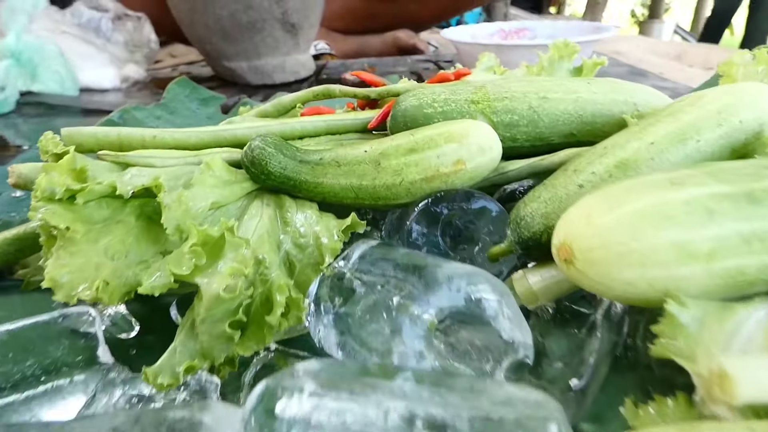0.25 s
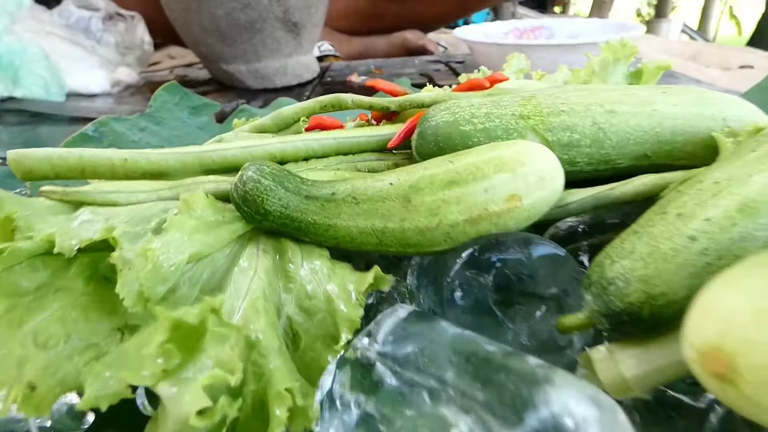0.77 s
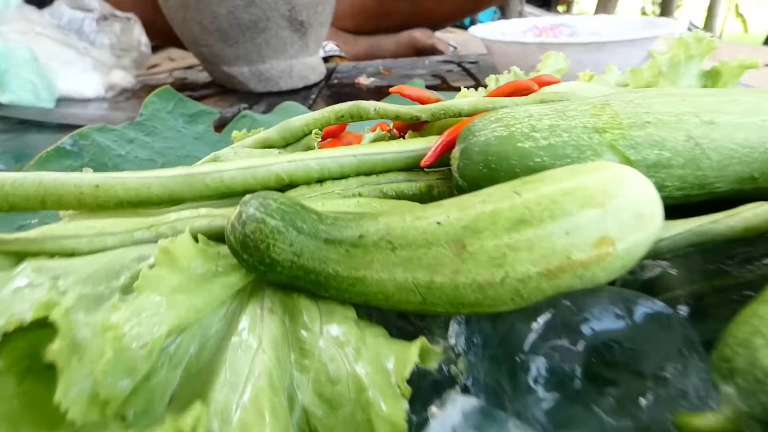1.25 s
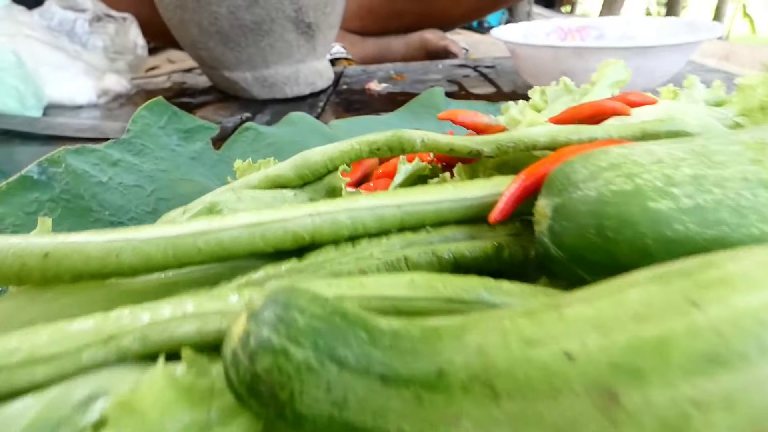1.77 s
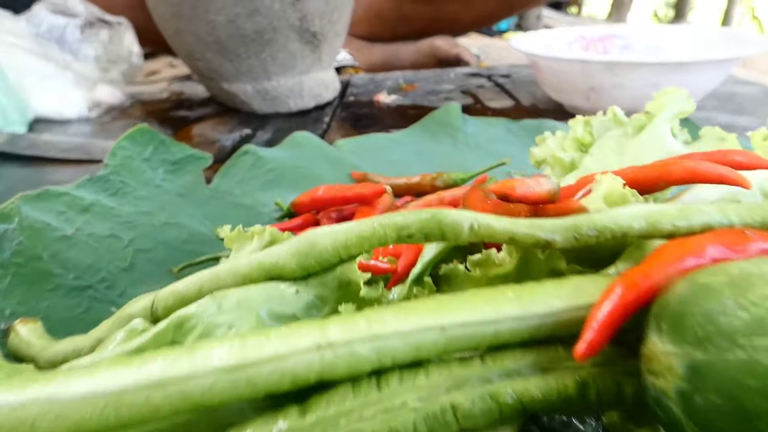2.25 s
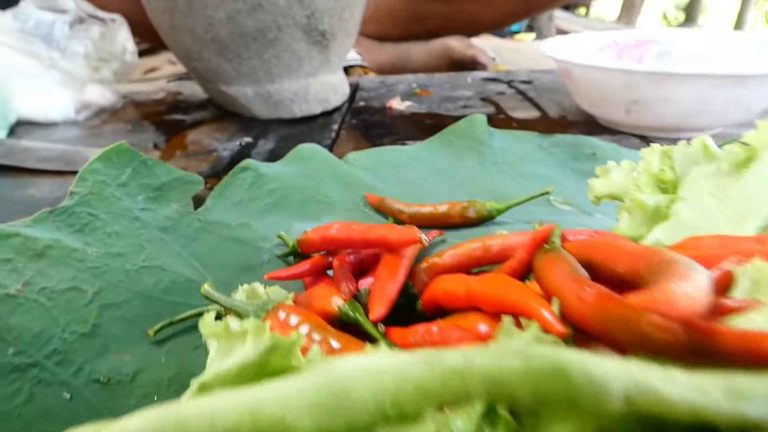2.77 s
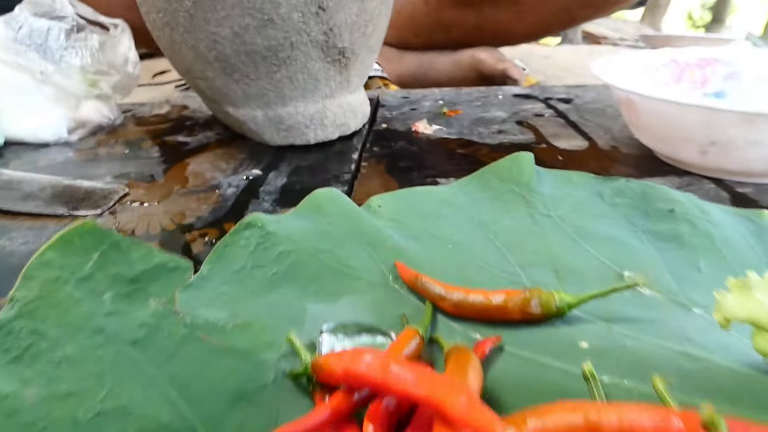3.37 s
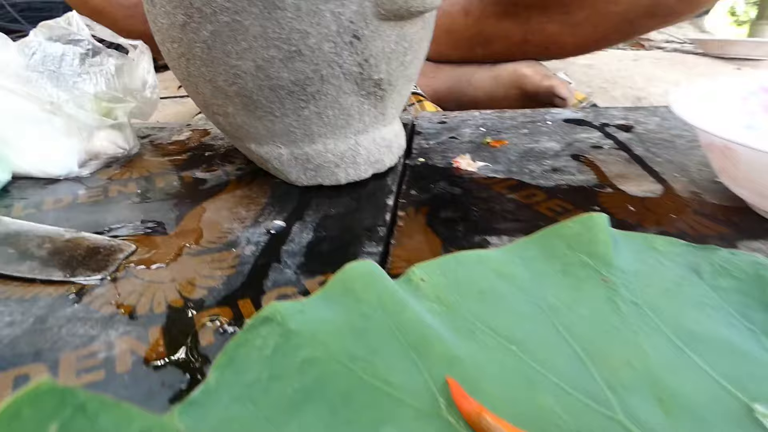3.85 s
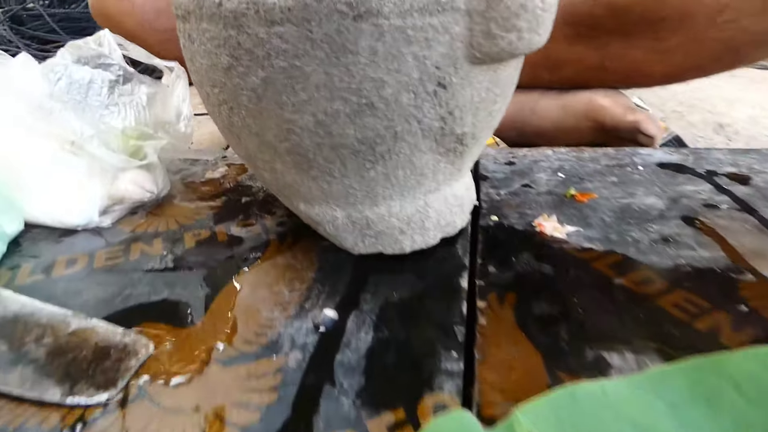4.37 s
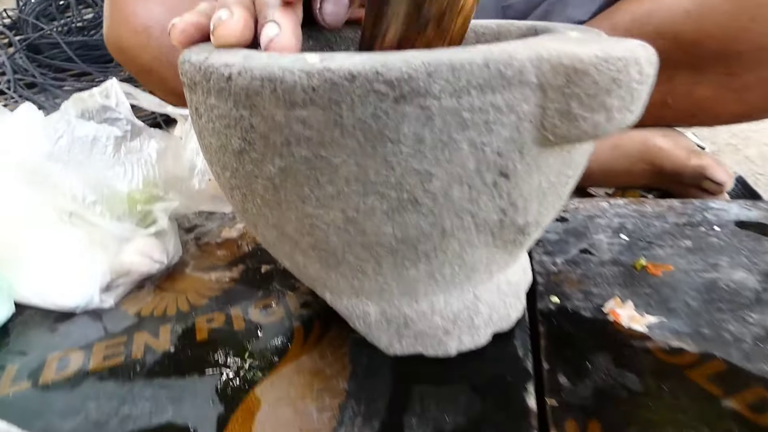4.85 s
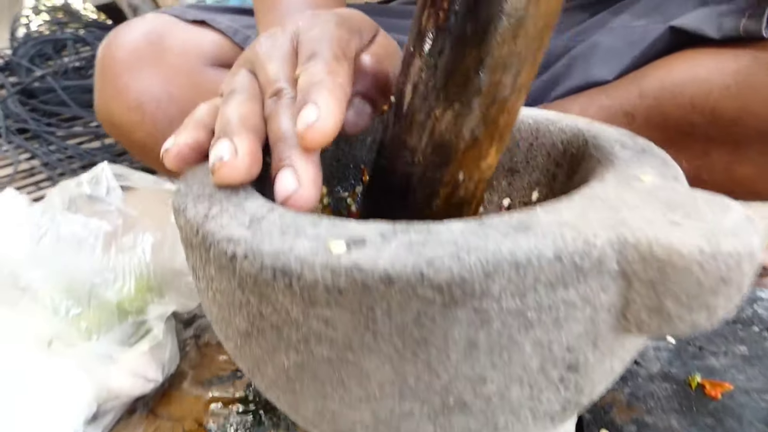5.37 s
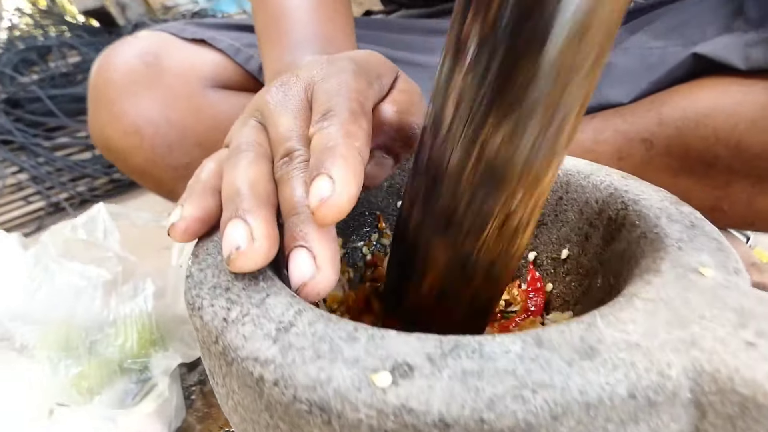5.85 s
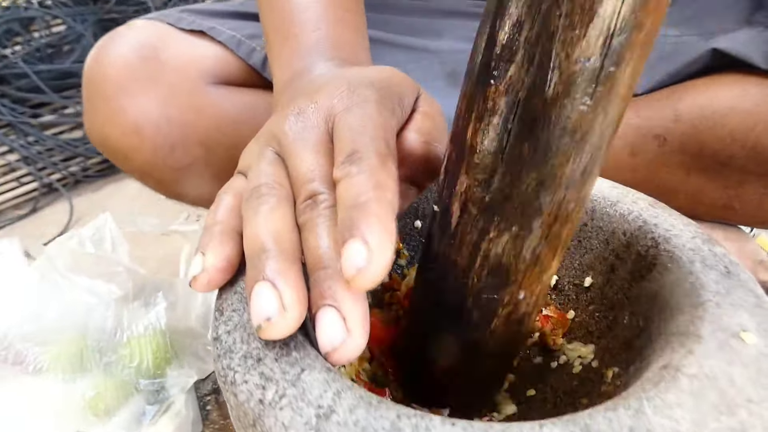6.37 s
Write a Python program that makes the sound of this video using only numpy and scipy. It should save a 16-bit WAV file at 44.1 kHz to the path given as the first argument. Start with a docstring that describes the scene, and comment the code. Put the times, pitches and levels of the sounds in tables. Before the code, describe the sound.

Outdoors in an open shelter, heard very close and nearly dry, a wooden pestle scrapes wet paste and strikes a stone mortar almost at once. Blows continue steadily about every 0.35 seconds until 6.4. Each is a short, dull thud with a woody board knock, a brief stony ring and a juicy crunch; force and hardness vary, some stonier, others muffled by paste. About halfway between blows the heavy mortar rocks back with a softer thud or clack. Scrapes are clearest before 1.2; squirts and sticky smacks follow throughout. Sharp seed snaps dot the sound, one strong near 3.0, a cluster from 4.1 to 4.9 and another at 6.4. Low outdoor air and a thin high insect hiss lie behind. Between 1.3 and 2.2, four faint, hoarse, sagging rooster-like syllables sound far away.

```python
"""First you hear a wooden pestle scrape wet paste and pound it in a stone mortar on a board, outdoors and close by.
Each blow squashes chillies and garlic (shaped noise and tiny bubbles), and rings stone and board (fading sines).
The mortar then rocks on the board with softer thuds and clacks; paste smacks and seeds snap between blows.
Far off there is a thin insect hiss (a narrow band of noise) and a call like a rooster's (sagging tones)."""
import sys
import numpy as np
from scipy import signal
from scipy.fft import rfft, irfft
from scipy.io import wavfile
from scipy.ndimage import uniform_filter1d

SR = 44100
rng = np.random.default_rng(int(sys.argv[2]) if len(sys.argv) > 2 else 0)


def waveform_to_disk(signal):
    """Save audio, clipped to [-1, 1], as 16-bit WAV at the path in sys.argv[1]."""
    frames = np.transpose(np.atleast_2d(signal))
    scaled = np.clip(frames, -1, 1) * 32767
    samples = np.round(scaled).astype(np.int16)
    wavfile.write(sys.argv[1], SR, samples)


N = 291489
TIME = np.arange(N) / SR
AGE = np.arange(SR // 4) / SR  # seconds since a hit

# outdoor air, its tone: (frequency [Hz], level per Hz [dB])
AIR = [(25, -13), (70, -8.5), (150, 5.5), (300, -1), (500, -7), (700, -8), (950, -12), (1500, -11.5),
       (3000, -19), (6200, -24), (15000, -38.5)]
# outdoor air, its loudness before it wavers: (time [s], level [dB])
AIR_LEVEL = [(0, -46), (3.2, -43.5), (4.8, -50), (5.2, -50), (6.6, -54)]
# syllables of a distant crow: (middle [s], length [s], pitch [Hz], level [dB], octave over fundamental [dB])
CROW = [(1.313, 0.1, 845, -44, -14), (1.498, 0.19, 712, -46, -10), (1.712, .14, 808, -42, -12),
        (2.135, 0.22, 624, -46.5, 1)]
# where the mortar stands: (time [s], left minus right [dB])
PLACE = [(0, -0.5), (3.3, 0.5), (5.3, -3), (6.6, -1.5)]
# the microphone closes in on the board and catches more of its bass: (time [s], low edge [Hz])
BASS_EDGE = [(0, 185), (1.2, 173), (3, 146), (6.6, 140)]
# how busily loose bits crackle in the bowl, before it flickers: (time [s], level [dB])
CRUMBS = [(0, -57), (2.1, -61), (3.1, -56), (4.8, -58), (5.25, -66), (6.6, -71)]
# seeds and flakes of skin snap in the bowl: (time [s], peak level [dB], ring pitch [Hz])
SNAPS = [(0.0084, -20, 3780), (0.354, -20.5, 2730), (1.0328, -25.5, 3900), (1.3215, -18.5, 3800),
         (1.7884, -24.5, 3540), (2.1979, -25, 4450), (2.437, -21.5, 1740), (3.0354, -11.5, 3210),
         (3.7445, -26, 1740), (4.081, -16, 4100), (4.1881, -15, 3580), (4.2109, -15, 4100),
         (4.261, -25, 1810), (4.42, -15, 3220), (4.521, -13, 3520), (4.5986, -18, 4000), (4.767, -16, 3200),
         (4.8772, -17, 3540), (6.418, -11, 6900)]
# colour of the wet paste: (frequency [Hz], level [dB])
PASTE = [(50, -56), (150, -9.5), (450, 2), (1600, -7.5), (2300, -8), (3600, -5.5), (7500, -12),
         (10500, -12.5), (12500, -19.5), (15000, -27)]
# resonances of the air in the bowl, which colour the paste: (frequency [Hz], width [Hz], level [dB])
HOLLOW = [(1760, 130, -6), (2812, 90, -7), (3808, 90, -3), (4530, 90, -7)]
# the pestle meets paste on the wall and scrapes down it until it lands: (first touch [s], level on landing [dB])
SCRAPES = [(0.008, -27), (0.357, -30), (0.729, -36), (0.762, -21.5), (1.107, -28), (3.242, -41.5),
           (3.972, -43)]
# sticky paste lets go of the pestle or drops back: (time [s], level [dB], fall [s])
SMACKS = [(0.117, -34, 0.01), (0.223, -47.5, 0.15), (0.39, -27.5, 0.016), (0.51, -37.5, 0.019),
          (0.596, -40, 0.02), (0.8, -33, 0.073), (0.875, -29, 0.018), (1.187, -33.5, 0.016),
          (1.228, -31.5, 0.021), (1.726, -29.5, 0.011), (3.471, -38.5, 0.013), (3.701, -38, 0.018),
          (4.085, -31.5, 0.016), (4.19, -30.5, 0.026), (4.512, -30, 0.016), (4.733, -30, 0.018),
          (4.937, -48.5, 0.043), (5.209, -41.5, 0.0092), (5.568, -38.5, 0.012), (6.019, -33, 0.0098),
          (6.107, -39.5, 0.03), (6.487, -39.5, 0.028)]
# less paste under the blow: louder stone, shorter and duller splat: (stone ring [dB], fall [s], brightness [dB])
CUSHION = [(-38, .006, 4), (-23, .0045, 7), (-14, .0012, -3)]
# the mortar rocks and lands on the board again: (time [s], thud [dB], thud pitch [Hz], clack [dB])
LANDINGS = [(0.098, -33, 325, -30.5), (0.223, -34.5, 299, -30.5), (0.453, -39, 206, -22.5),
            (0.462, -18.5, 304, -24.5), (0.479, -33, 307, -23), (0.796, -37, 296, -18),
            (0.811, -20.5, 305, -29), (0.827, -29, 317, -36), (0.843, -31, 299, -23),
            (1.189, -43, 293, -16.5), (1.213, -42, 288, -29), (1.532, -19, 276.5, -41),
            (1.551, -41, 258, -25.5), (1.907, -25, 277, -28), (2.272, -34, 274, -28),
            (2.972, -22.5, 277, -21), (3.318, -23, 274, -25.5), (3.609, -33, 273, -56),
            (3.669, -23, 287, -49), (3.711, -28, 281, -30.5), (4.05, -29.5, 281, -56),
            (4.358, -25, 250, -32), (4.694, -23.5, 266, -41), (5.023, -33.5, 244, -35.5),
            (5.35, -24, 236, -60), (5.394, -25, 235, -31), (5.745, -23, 260, -28), (6.104, -31, 282, -31),
            (6.401, -36, 234, -56), (6.437, -25, 252.6, -29.5)]
# bending modes of the board, varied a little at each hit: (pitch [Hz], level [dB], time to fall 60 dB [s])
BOARD = [(291.6, -2.5, 0.22), (361, -4.5, 0.13), (432, 1, 0.076), (544.4, 2, 0.053), (616, -1.5, 0.055),
         (681, -2.5, 0.028), (770, 6.5, 0.02), (910, 9.5, 0.012), (874, -5.5, 0.021)]
# modes of the stone bowl: (multiple of the ring pitch [ratio], level [dB], time to fall 60 dB [s])
STONE = [(0.862, -12.5, 0.012), (0.998, -8, 0.018), (1.03, -27.5, 0.082), (2.62, -12.5, 0.0013)]
# pestle blows: (time [s], thud [dB], thud pitch [Hz], thud's time to fall 60 dB [s], wooden knock [dB],
# knock's top [Hz], stone ring [dB], ring pitch [Hz], splat [dB], squirt's delay [s], squirt [dB])
BLOWS = [(0.0374, -38, 222, 0.063, -13.5, 1300, -15.5, 1280, -14, .004, -50),
         (0.4182, -18.5, 190, 0.059, -23.5, 620, -46, 1690, -22, 0.0011, -25.5),
         (0.782, -22, 249, 0.033, -22.5, 1000, -36, 1500, -23.5, 0.0051, -26),
         (1.1431, -21.5, 264, 0.15, -14, 920, -20.5, 1570, -20, 0.0063, -31),
         (1.514, -20.5, 195, 0.057, -20, 700, -33.5, 1370, -19, 0.015, -25),
         (1.88, -24, 198, 0.04, -14, 955, -18.5, 1340, -26.5, 0.025, -36),
         (2.2496, -24, 221, 0.038, -16, 1040, -14, 1333, -19.5, 0.021, -39.5),
         (2.608, -51, 249, 0.1, -18.5, 1200, -15.5, 1293, -24.5, 0.045, -33.5),
         (2.952, -15.5, 200, 0.081, -23, 710, -31.5, 1550, -23, 0.026, -28),
         (3.2988, -16.5, 193, 0.029, -15, 1030, -23, 1580, -18, 0.008, -27.5),
         (3.6541, -11.5, 240, 0.026, -21.5, 460, -48, 1420, -30, 0.013, -30.5),
         (4.007, -14.5, 183, 0.031, -15, 550, -24, 1690, -23.5, 0.021, -34.5),
         (4.341, -14.5, 188, 0.015, -17.5, 710, -20, 1603, -20.5, 0.018, -34.5),
         (4.672, -19.5, 153, 0.045, -25, 550, -25, 1710, -20.5, 0.011, -27.5),
         (5.011, -37, 230, 0.15, -34, 1300, -13, 1320, -14, 0.035, -43.5),
         (5.336, -38, 232, 0.089, -25, 1300, -33, 1170, -56, 0.033, -24.5),
         (5.7173, -17.5, 224, 0.034, -15.5, 1000, -21, 1350, -30.5, 0.018, -25),
         (6.0543, -19.5, 198.5, 0.12, -17, 1200, -17, 1350, -26.5, 0.011, -29),
         (6.383, -25.5, 221, 0.093, -26, 860, -37, 1370, -32, 0.027, -28.5)]

# brightness is treble over bass
SCRAPE_RISE_S, SCRAPE_GROWTH_DB_PER_S, SCRAPE_BRIGHT_DB = .003, 75, -8.5
SPLAT_RISE, SPLAT_LEAD = .4, .3  # the rise, and how far it peaks ahead of the landing, as shares of its fall
SQUIRT_RISE_S, SQUIRT_FALL_S, SQUIRT_BRIGHT_DB = .0075, .009, 7.5
OOZE_DB, OOZE_FALL_S, OOZE_BRIGHT_DB = -8, 0.029, -2.5  # the squirt's tail, level relative to the squirt
SMACK_RISE_S, SMACK_BRIGHT_DB = .0014, -8.5
SPATTER_DB, SPATTER_RISE_S, SPATTER_FALL_S = -19, .0012, .009  # juice from a snap, relative to its peak
PRESS_S = 0.024  # the pestle bears down and damps the board's knock
STONE_EDGE_HZ = 265  # the small bowl sends out little below this
TOP_HZ = 15600


def undb(db):
    """Decibels to gain."""
    return 10 ** (np.asarray(db) / 20)


def at(s, rows):
    """Read a table of (time, value) at time s, joined by straight lines."""
    return np.interp(s, *np.transpose(rows))


def unit(x):
    """Scale to an rms (average strength) of 1."""
    return x / np.sqrt(np.mean(x ** 2))


def struck(x, db):
    """Set the level of the first fiftieth of a second of a hit."""
    return x * undb(db) / np.sqrt(np.mean(x[:SR // 50] ** 2))


def crest(x, db):
    """Set the level of the loudest fiftieth of a second of a sound."""
    return x * undb(db) / np.sqrt(uniform_filter1d(x ** 2, SR // 50).max())


def add(out, s, x, pan_db=0):
    """Mix a sound into both channels at time s; pan_db is left minus right."""
    start = int(round(s * SR))
    lo, hi = max(start, 0), min(start + len(x), N)
    gains = undb([[pan_db / 2], [-pan_db / 2]])
    out[:, lo:hi] += gains * x[lo - start:hi - start]


def colour(x, points):
    """Filter by a spectrum of (Hz, dB) points, keeping the power of white noise."""
    hz, db = np.transpose(points)
    f = np.maximum(np.fft.rfftfreq(x.shape[-1], 1 / SR), 1)
    gain = unit(undb(np.interp(np.log(f), np.log(hz), db)))
    return irfft(rfft(x) * gain, x.shape[-1])


def walk(rate):
    """Smooth chance with a spread near 1, taking about rate new values a second."""
    k = int(SR / rate)
    steps = np.repeat(rng.standard_normal(N // k + 1), k)
    return np.sqrt(3 / 2) * uniform_filter1d(steps, k)[:N]


def swell(s, rise, fall):
    """An envelope that peaks at time s."""
    distance = np.maximum((s - TIME) / rise, (TIME - s) / fall)
    return np.exp(-np.minimum(distance, 30))


def mode(hz, t60):
    """One fading resonance, pushed downwards first; it falls 60 dB in t60 seconds."""
    return -np.sin(2 * np.pi * hz * AGE) * np.exp(-np.log(1000) * AGE / t60)


def radiate(x, edge_hz):
    """Air slips round the edges of a small surface, so it sends out no deep bass."""
    return signal.sosfilt(signal.butter(4, edge_hz, "high", fs=SR, output="sos"), x)


def outdoors(insect_hz=7480.0, insect_db=-64.5, width=0.6):
    """Low outdoor air and a narrow insect hiss, both noise that wavers in level."""
    mid, side, left, right = rng.standard_normal((4, N))
    air = colour(np.array([mid + width * side, mid - width * side]), AIR) * undb(walk(3.59))
    band = signal.butter(2, [insect_hz - 190, insect_hz + 190], "band", fs=SR, output="sos")
    insects = unit(signal.sosfilt(band, [left, right])) * undb(insect_db + walk(46))
    return air * undb(at(TIME, AIR_LEVEL)) + insects


def rooster():
    """Four faint, slightly hoarse syllables: harmonics on an unsteady pitch that sags."""
    out = np.zeros(N)
    hoarse, sag = 1 + .009 * walk(140), .04
    for s, length, hz, db, octave_db in CROW:
        along = np.clip((TIME - s) / length, -.5, .5)
        phase = 2 * np.pi * np.cumsum(hz * (1 - sag * along) * hoarse) / SR
        arch = np.sqrt(1 - (2 * along) ** 2)
        overtones = np.sin(2 * phase) + np.sin(3 * phase) / 3
        out += undb(db) * arch * (np.sin(phase) + undb(octave_db) * overtones)
    return out


def shelter(x, t60=0.085, wet_db=-12.0, first_s=0.0004):
    """Small nearby surfaces return a short scatter without bass, different at each ear."""
    fade = np.exp(-np.log(1000) * AGE / t60) * (AGE > first_s)
    tail = radiate(rng.standard_normal((2, len(AGE))) * fade, edge_hz=185.0)
    tail /= np.sqrt(np.sum(tail ** 2, axis=1, keepdims=True))
    return x + undb(wet_db) * signal.fftconvolve(x, tail, axes=1)[:, :N]


def snap(hz, db, crack_s=.0006, ring_t60=.01, ring_db=-2.5, edge_hz=1000.0):
    """Something brittle breaks: a sharp crack, and a short ring at hz and at two chance pitches near it."""
    burst = rng.standard_normal(len(AGE)) * np.exp(-AGE / crack_s)
    crack = radiate(colour(burst, PASTE), edge_hz)[:SR // 40]
    others = sum(mode(hz * 2 ** octaves, ring_t60) for octaves in rng.uniform(-0.81, 1, 2))
    ring = mode(hz, ring_t60) + others / 2
    tick = unit(crack) + undb(ring_db) * unit(ring[:SR // 40])
    return tick * undb(db) / np.abs(tick).max()


def seeds(count=64, least_db=16, spread_db=11, ring_hz=3300.0):
    """Seeds snap with lone, sharp ticks: the clear ones, and faint ones now and then."""
    out, busy_db = np.zeros((2, N)), at(TIME, CRUMBS)
    for s, db, hz in SNAPS:
        add(out, s, snap(hz, db), at(s, PLACE))
    for when, size, place, register in rng.random((count, 4)):
        db = busy_db[int(when * N)] + least_db + spread_db * size ** 2
        hz = ring_hz * 2 ** (register - .5)
        add(out, when * N / SR, snap(hz, db), 2 * (2 * place - 1))
    return out


def bubbles(count=9000, lowest_hz=900, octaves=3.8, cycles=7, size_db=4.5):
    """Tiny air pockets burst, each ringing for a few cycles at its own pitch; a few are much louder."""
    out, age = np.zeros(N + SR // 40), AGE[:SR // 40]
    for when, register, chance in rng.random((count, 3)):
        hz, start = lowest_hz * 2 ** (octaves * register), int(when * N)
        # high bubbles fade sooner, so they start louder: 6 dB an octave
        size = undb(size_db * min(-np.log(1 - chance), 3) + 6 * octaves * register)
        out[start:start + len(age)] += size * np.sin(2 * np.pi * hz * age) * np.exp(-hz * age / cycles)
    return unit(out[:N])


def pops(bubble_db=-4.0):
    """Swarms of tiny pops and bubbles: noise in five registers, clumping together and each on its own."""
    out, edges = 0, (100, 1500, 3000, 6000, 10000, 17000)  # Hz
    clumps_db = 2.2 * walk(250) + 3.4 * walk(2000)
    for lo, hi in zip(edges, edges[1:]):
        band = signal.butter(3, [lo, hi], "band", fs=SR, output="sos")
        size_db = clumps_db + 2.6 * walk(400)
        out = out + signal.sosfilt(band, rng.standard_normal((2, N)) * undb(size_db))
    # the bubbles go into the middle only
    out = unit(out) + undb(bubble_db) * np.outer([1, 0], bubbles())
    hollow = sum(undb(db) * signal.lfilter(*signal.iirpeak(hz, hz / width, fs=SR), out)
                 for hz, width, db in HOLLOW)
    return colour(unit(out + hollow), PASTE)


def squelches():
    """What happens to the paste, as (envelope, brightness dB): scrape, splat, squirt, ooze, smack and spatter."""
    landings = np.array(BLOWS)[:, 0]
    rings, falls, brights = np.transpose(CUSHION)
    for s, db in SCRAPES:
        lands = landings[landings > s][0]
        growth_db = SCRAPE_GROWTH_DB_PER_S * np.minimum(TIME - lands, 0)
        scrape = undb(db + growth_db) * swell(s, SCRAPE_RISE_S, np.inf) * (TIME < lands)
        yield scrape, SCRAPE_BRIGHT_DB
    for s, *_, ring_db, _, splat_db, after_s, squirt_db in BLOWS:
        fall = np.interp(ring_db, rings, falls)
        splat = undb(splat_db) * swell(s - SPLAT_LEAD * fall, SPLAT_RISE * fall, fall)
        yield splat, np.interp(ring_db, rings, brights)
        squirt = undb(squirt_db) * swell(s + after_s, SQUIRT_RISE_S, SQUIRT_FALL_S)
        yield squirt * (TIME > s), SQUIRT_BRIGHT_DB
        ooze = undb(squirt_db + OOZE_DB) * swell(s + after_s, OOZE_FALL_S, OOZE_FALL_S)
        yield ooze * (TIME > s), OOZE_BRIGHT_DB
    for s, db, fall in SMACKS:
        yield undb(db) * swell(s, SMACK_RISE_S, fall), SMACK_BRIGHT_DB
    for s, db, _ in SNAPS:
        yield undb(db + SPATTER_DB) * swell(s, SPATTER_RISE_S, SPATTER_FALL_S), SMACK_BRIGHT_DB


def paste(split_hz=4020.0, width=0.4):
    """Juice and air burst from the paste in swarms of tiny pops; it fizzles on faintly in between."""
    dull, bright = np.zeros(N), np.zeros(N)  # power below and above split_hz
    for envelope, bright_db in squelches():
        share = 1 / (1 + undb(-bright_db) ** 2)
        dull += 2 * (1 - share) * envelope ** 2
        bright += 2 * share * envelope ** 2
    flicker_db = 4.2 * walk(30)
    loose = undb(at(TIME, CRUMBS) + flicker_db) ** 2
    mid, side = pops()
    wet = np.array([mid + width * side, mid - width * side])
    low = signal.sosfiltfilt(signal.butter(2, split_hz, fs=SR, output="sos"), wet)
    return low * np.sqrt(dull + loose) + (wet - low) * np.sqrt(bright + loose)


def board(push, top_hz):
    """The board's clack: each contact point weights the modes anew; a soft push misses those above top_hz."""
    chance = rng.standard_normal((len(BOARD), 2)) * [2.5, .015]  # level in dB, pitch as a share
    rings = np.zeros(len(AGE))
    for (hz, db, t60), (size_db, shift) in zip(BOARD, chance):
        softness = np.sqrt(1 + (hz / top_hz) ** 10)
        rings += undb(db + size_db) * mode(hz * (1 + shift), t60) / softness
    return signal.fftconvolve(rings, push)[:len(AGE)]


def bounce(push, hz, t60, tilt_db=-7.5):
    """The heavy mortar bobs on the springy board and tilts at a higher pitch, by how its foot sits."""
    tilt = rng.uniform(1.5, 2.6)
    bob = mode(hz, t60) + undb(tilt_db) * mode(tilt * hz, t60)
    return signal.fftconvolve(bob, push)[:len(AGE)]


def rocking(rattle=0.056, rattle_s=0.025, soft_s=0.00018, thud_t60=0.06, top_hz=730.0):
    """After a blow the mortar tips, lands again and rattles briefly on the wet board."""
    out = np.zeros((2, N))
    contact = AGE * np.exp(-AGE / soft_s)
    for s, thud_db, thud_hz, clack_db in LANDINGS:
        chatter = rattle * rng.standard_normal(len(AGE)) * np.exp(-AGE / rattle_s)
        taps = signal.unit_impulse(len(AGE)) + chatter
        push = radiate(np.convolve(taps, contact[:SR // 200]), at(s, BASS_EDGE))
        thud = crest(bounce(push, thud_hz, thud_t60), thud_db)
        clack = crest(board(push, top_hz), clack_db)
        add(out, s, thud + clack, at(s, PLACE))
    return out


def pestle(chatter=0.037, chatter_s=0.021, contact_s=.0001):
    """Each blow bounces the heavy mortar on the board, knocks the wood and rings the stone."""
    out = np.zeros((2, N))
    contact = AGE * np.exp(-AGE / contact_s)  # the wooden tip yields a little
    contact /= contact.sum()
    for s, thud_db, thud_hz, thud_t60, knock_db, top_hz, ring_db, ring_hz, *_ in BLOWS:
        # one firm contact, then the rough foot chatters for an instant
        rattle = chatter * rng.standard_normal(len(AGE)) * np.exp(-AGE / chatter_s)
        # the heavy bowl follows only the slow part of the push
        slow = signal.butter(2, top_hz, fs=SR, output="sos")
        shove = signal.sosfilt(slow, contact + rattle / 2)
        edge_hz = at(s, BASS_EDGE)
        thud = radiate(bounce(shove, thud_hz, thud_t60), edge_hz)
        knock = radiate(board(contact + rattle, top_hz), edge_hz) * np.exp(-AGE / PRESS_S)
        stone = sum(undb(db) * mode(ratio * ring_hz, t60) for ratio, db, t60 in STONE)
        ring = radiate(signal.fftconvolve(stone, contact)[:len(AGE)], STONE_EDGE_HZ)
        blow = struck(thud, thud_db) + struck(knock, knock_db) + struck(ring, ring_db)
        add(out, s, blow, at(s, PLACE))
    return out


def scene():
    """The mortar in its open shelter, with the air, insects and rooster beyond it."""
    mortar = pestle() + rocking() + paste() + seeds()
    return shelter(mortar) + outdoors() + rooster()


def record(dry, ceiling=0.98):
    """Round off the highest peaks, then cut the treble above TOP_HZ."""
    rounded = dry / (1 + (dry / ceiling) ** 4) ** (1 / 4)
    return signal.sosfilt(signal.ellip(8, .2, 70, TOP_HZ, fs=SR, output="sos"), rounded)


dry = scene()
out = record(dry)
waveform_to_disk(out)
```